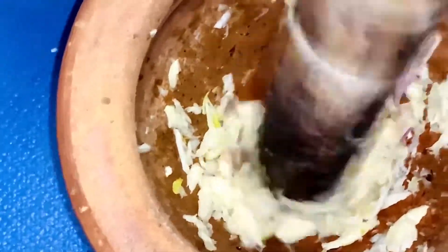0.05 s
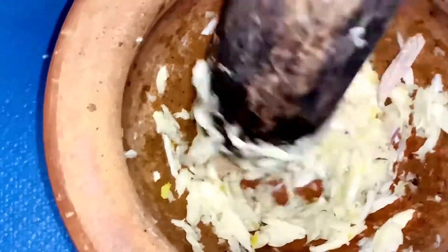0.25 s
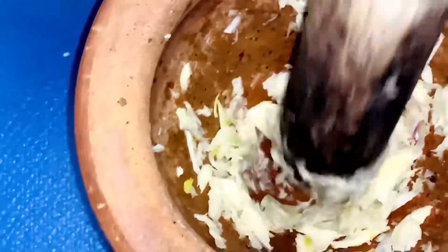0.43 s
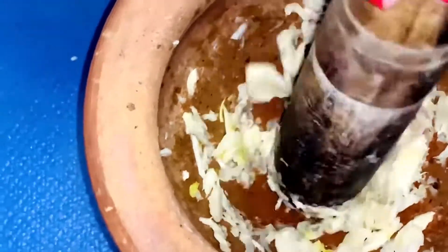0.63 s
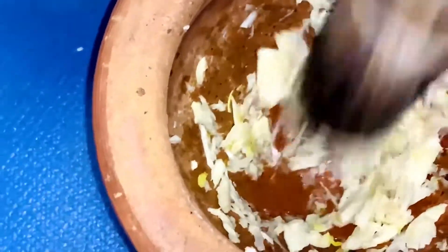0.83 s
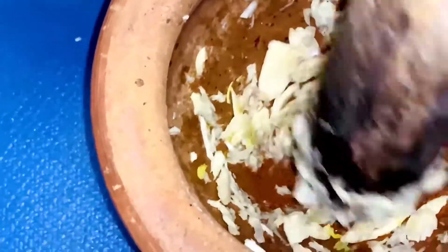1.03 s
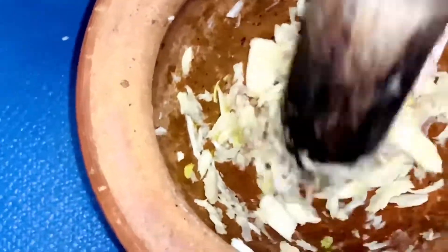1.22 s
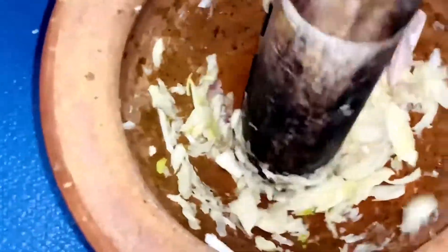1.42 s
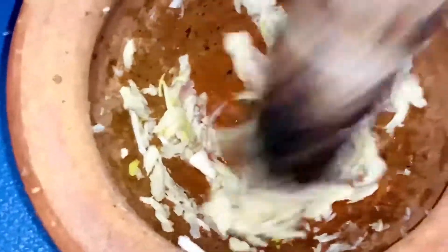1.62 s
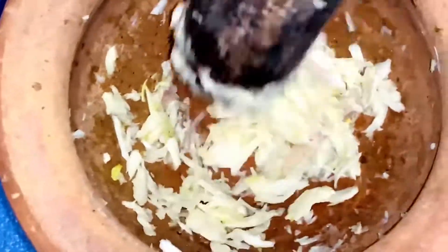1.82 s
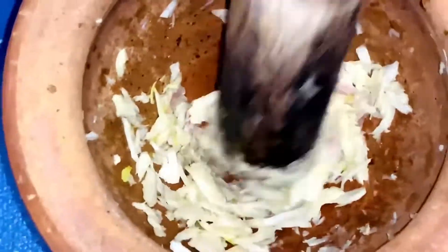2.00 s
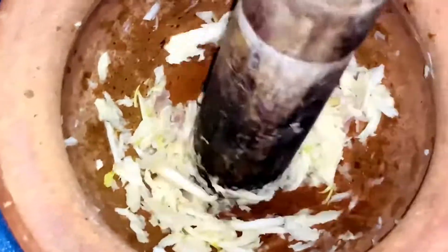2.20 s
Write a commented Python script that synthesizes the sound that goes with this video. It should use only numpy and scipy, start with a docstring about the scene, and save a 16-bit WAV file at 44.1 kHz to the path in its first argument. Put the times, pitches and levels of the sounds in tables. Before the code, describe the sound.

Steady close pounding of a pestle crushing garlic in a clay mortar, thumping and crunching.

```python
"""Pounding garlic in a clay mortar

A wooden pestle works chopped garlic on a kitchen table, about four strokes a second. Each stroke
meets the heap or glances off the wall, crushes the wet pieces, lands on the bottom and lifts with a
squelch. Every contact knocks the clay and thumps the table, heard close, in stereo, in a small room."""
import sys
import numpy as np
from scipy import signal
from scipy.fft import rfft, irfft, next_fast_len
from scipy.io import wavfile
from scipy.ndimage import uniform_filter1d

SR = 44100
rng = np.random.default_rng(int(sys.argv[2]) if len(sys.argv) > 2 else 0)


def to_wav(sig):
    """Store sig (one row per channel, or 1-D mono) as 16-bit WAV at the path in sys.argv[1].

    Samples outside -1..1 are clipped; the rate is SR.
    """
    pcm = np.clip(np.atleast_2d(sig), -1, 1) * 32767
    pcm = np.round(pcm).astype(np.int16)
    wavfile.write(sys.argv[1], SR, pcm.T)  # frames by channels


N = 103635

# pestle meets heap or wall: t/s, table thump/dB, clay knock/dB, knock brightness/Hz, crunch/dB
TOUCHES = [(0.2132, -26, -46, 1960, -34.5), (.479, -19, -26.5, 1560, -44), (0.7299, -25.5, -59, 2010, -44),
           (0.9837, -14.5, -28, 3000, -37), (1.2433, -25, -23.5, 2740, -45),
           (1.5099, -22.5, -44, 2340, -47.5), (1.7591, -15, -11, 4080, -35.5),
           (2.0269, -16.5, -15.5, 3500, -43), (2.27, -26.5, -39, 2480, -47.5)]
# pestle lands on the bottom: t/s, table thump/dB, thump brightness/Hz, clay knock/dB,
# knock brightness/Hz, crunch/dB, crunch build-up/s
LANDINGS = [(-.04, -6, 292, -21, 1580, -38, 0.0094), (0.221, -5.5, 450, -4, 1350, -28.5, 0.0039),
            (.494, -8, 278, -24.5, 1270, -28, 0.0049), (0.7568, -9, 216.6, -28, 1305, -29.5, 0.0065),
            (1.0077, -21, 286.5, -35, 1780, -34.5, 0.0049), (1.269, -12, 210, -31, 1800, -32.5, 0.0084),
            (1.535, -15, 186.8, -34, 1800, -34.5, 0.0094), (1.79, -20.5, 260, -34.5, 1810, -36, 0.015),
            (2.0578, -19.5, 186, -40.5, 1800, -30.5, 0.0095)]
TABLE_PAN_DB, CLAY_PAN_DB = -0.56, 0.57


def amp(db):
    """Decibels to gain."""
    return 10 ** (np.asarray(db) / 20)


def curve_at(points, hz):
    """Reads a curve on a log-frequency axis."""
    f, value = np.transpose(points)
    return np.interp(np.log(hz + 1), np.log(f + 1), value)


def add(mix, s, sound):
    """Mixes a sound in at time s, which may lie before the start."""
    at = round(s * SR)
    sound = sound[..., max(-at, 0):]
    part = mix[..., max(at, 0):][..., :sound.shape[-1]]
    part += sound[..., :part.shape[-1]]


def colour(x, points):
    """Applies an EQ curve scaled to unit mean power."""
    size = next_fast_len(N + 4096, True)
    gain = amp(curve_at(points, np.fft.rfftfreq(size, 1 / SR)))
    return irfft(rfft(x, size) * gain / np.sqrt(np.mean(gain ** 2)), size)[..., :N]


def pan(db):
    """Left and right gains; positive leans left."""
    return amp([[db], [-db]])


def table_thump(edge_hz, left_lag_s=0.00008):
    """The table gives under the mortar and swings back at a sinking pitch."""
    # damped flexing, higher waves arriving first: f/Hz, level/dB, swell/s, shortness, sag/(Hz/s)
    flexes = [(153.5, 1, .012, 13.85, 2803.5), (323, -8.5, 0.0054, 1.9, 3493.5), (46, -28.5, 0.0043, 4, -2)]
    t = np.maximum(np.arange(SR // 20) / SR - np.array([[left_lag_s], [0]]), 0)
    thump = np.zeros_like(t)
    for hz, db, swell, shortness, sag in flexes:
        cushion = 1 / np.sqrt(1 + (hz / edge_hz) ** 4)  # a soft contact barely stirs the higher modes
        envelope = (t / swell * np.exp(1 - t / swell)) ** shortness
        cycles = (hz - sag * (t - swell) / 2) * (t - swell)
        thump += cushion * amp(db) * envelope * np.cos(2 * np.pi * cycles)
    return pan(TABLE_PAN_DB) * thump


def table_ring(rise_s=0.017):
    """The table rings on faintly after each thump."""
    # the table's low modes: f/Hz, level/dB, t60/s
    modes = [(80.1, -26.5, 0.59), (96.15, -18, 0.36), (114, -23.5, 0.26), (173.27, -17, 0.22),
             (215.4, -26, .2), (284, -36.5, 0.25)]
    t = np.arange(SR // 2) / SR
    ring = sum(amp(db - 60 * t / t60) * np.sin(2 * np.pi * hz * t) for hz, db, t60 in modes)
    return pan(TABLE_PAN_DB) * ring * (1 - np.exp(-(t / rise_s) ** 2))


def clay_knock(edge_hz, rise_s=0.00026):
    """The mortar rings briefly, damped by food and pestle; a softer contact sounds fewer modes."""
    # the mortar's modes: f/Hz, level/dB, t60/s, left channel's lead/rad
    modes = [(714, -13.5, 0.0076, 0.59), (974, -2, 0.013, 0.62), (1148, -6, 0.021, 0.69),
             (1557, -14.5, 0.028, 0.9), (1822, -10, 0.013, 0.71), (2470, -9, 0.029, 1.4),
             (2634, -19, 0.11, 0), (2812, -2.5, 0.019, 1), (3390, -14, 0.031, 2.1), (3640, -4.5, .02, 0.06),
             (3772, -4, .018, 1.2), (4130, -10.5, 0.02, 2)]
    t = np.arange(SR // 5) / SR
    ring = np.zeros((2, len(t)))
    for k, (hz, db, t60, lead) in enumerate(modes):
        phase = np.array([[lead], [-lead]]) / 2 + np.pi * (k % 2)  # modes alternate in polarity
        ring += amp(db - 60 * t / t60) * np.sin(2 * np.pi * hz * t + phase)
    ring *= pan(CLAY_PAN_DB) * (1 - np.exp(-t / rise_s))
    return signal.sosfilt(signal.butter(7, edge_hz, fs=SR, output="sos"), ring)


def pestle_hits(touch_thump_hz=330):
    """Both contacts of each stroke shake the table and knock the clay."""
    hits, after_ring = np.zeros((2, N)), table_ring()
    touches = [(s, thump_db, touch_thump_hz, *rest) for s, thump_db, *rest in TOUCHES]
    for s, thump_db, thump_hz, knock_db, knock_hz, *_ in touches + LANDINGS:
        add(hits, s, amp(thump_db) * table_thump(thump_hz))
        add(hits, s, amp(thump_db) * after_ring)
        add(hits, s, amp(knock_db) * clay_knock(knock_hz))
    return hits


def crackle(envelope, per_s, spread_db, patch_hz=600, patch_db=1):
    """Tiny random clicks of uneven size under an envelope; each handful has its own patchy colour."""
    n = len(envelope)
    size = amp(spread_db * np.minimum(rng.exponential(1, n), 4))
    clicks = envelope * size * rng.choice([-1, 1], n) * (rng.random(n) < per_s / SR)
    patches = np.interp(np.fft.rfftfreq(n, 1 / SR) / patch_hz, np.arange(n), rng.standard_normal(n))
    clicks = irfft(rfft(clicks) * amp(patch_db * patches), n)
    return clicks * np.linalg.norm(envelope) / (np.linalg.norm(clicks) + 1e-12)


def crush(t, rise_s, fade_s):
    """Cells burst ever harder up to the contact at t = 0, then die away."""
    return crackle(np.exp(np.minimum(t / rise_s, -t / fade_s)), per_s=3200, spread_db=4)


def wet_pops(envelope):
    """The mash crackles with small wet pops."""
    return crackle(envelope, per_s=2400, spread_db=5)


def garlic(cling_db=-23.5, cling_fade_s=0.018):
    """The pieces crunch under the pestle, a few firm ones snap, and the mash squelches on the lift."""
    # single firm pieces or bubbles bursting: t/s, level/dB, treble tilt/(dB/octave)
    bursts = [(0.2192, -17.5, -0.5), (.478, -32.5, 4.5), (.494, -26, -8.5), (0.574, -45, 5),
              (0.985, -53, -1.5), (1.007, -20.5, 4), (1.047, -47, 12), (1.065, -41.5, 1), (1.510, -33, 5.5),
              (1.5312, -34.5, 0.5), (1.578, -63.5, 4)]
    # pestle pulling out of the wet mash: t/s, level/dB, half length/s
    lifts = [(0.026, -54.5, 0.02), (0.294, -56, 0.019), (0.559, -53.5, 0.011), (0.831, -52.5, 0.011),
             (1.084, -51, 0.011), (1.345, -55.5, 0.0089), (1.6, -57.5, 0.014), (1.876, -52, 0.01),
             (2.123, -55, 0.01)]
    # tone of the crunch, the snaps and the squelch: f/Hz, relative level/dB
    crunch_eq = [(250, -21.5), (600, 7), (1100, 3), (2000, -0.5), (3300, 4.5), (4600, 1.5), (6400, 2.5),
                 (8000, -4), (11000, 3), (14500, 1.5), (16000, 0)]
    snap_eq = [(400, -15), (1200, -11), (3300, 3), (6500, -1.5), (11000, -0.5), (14500, 0), (16000, -5)]
    squelch_eq = [(250, -22.5), (700, -0.5), (1200, 1.5), (2000, -4), (3400, 4), (4800, -2.5), (6400, -2),
                  (9000, -7), (13000, -1.5), (16000, -6)]
    t = np.arange(-SR // 10, SR // 10) / SR
    crunch, snaps, squelch = np.zeros((3, N))
    for s, *_, db in TOUCHES:
        add(crunch, s + t[0], amp(db) * crush(t, rise_s=0.0014, fade_s=0.013))
    cling = np.exp(-t[t >= 0] / cling_fade_s)  # the mash keeps crackling under the resting pestle
    for s, *_, db, build_s in LANDINGS:
        add(crunch, s + t[0], amp(db) * crush(t, rise_s=build_s, fade_s=0.0022))
        add(squelch, s, amp(db + cling_db) * wet_pops(cling))
    octaves = np.log2(np.fft.rfftfreq(len(t), 1 / SR) / 7500 + 1)  # the tilt's knee is at 7500 Hz
    for s, db, tilt in bursts:
        snap = crush(t, rise_s=0.001, fade_s=0.00032)
        slope = amp(tilt * octaves)
        add(snaps, s + t[0], amp(db) * irfft(rfft(snap) * slope / slope.mean()))
    for s, db, half_s in lifts:
        add(squelch, s + t[0], amp(db) * wet_pops(1 / np.cosh(t / half_s * np.sqrt(2))))
    return colour(crunch, crunch_eq) + colour(snaps, snap_eq) + colour(squelch, squelch_eq)


def in_bowl(mono, left_lag_s=0.00012, echo_db=1, t60_s=0.029):
    """The crunch reaches the left side a touch late and echoes quickly inside the bowl."""
    delay = np.exp(-2j * np.pi * np.fft.rfftfreq(N, 1 / SR) * left_lag_s)
    direct = np.array([irfft(rfft(mono) * delay, N), mono])
    t = np.arange(SR // 10) / SR
    tail = rng.standard_normal((2, len(t))) * amp(-60 * t / t60_s)
    tail /= np.linalg.norm(tail[0])
    return direct + amp(echo_db) * signal.fftconvolve(direct, tail, axes=1)[:, :N]


def diffuse_noise():
    """Stereo white noise, narrow in the bass and wide in the treble."""
    # likeness of the two sides: f/Hz, correlation
    likeness = [(60, 0.79), (200, 0.95), (550, 0.64), (1600, 0.083), (15000, .15)]
    left, other = rfft(rng.standard_normal((2, N)))
    same = curve_at(likeness, np.fft.rfftfreq(N, 1 / SR))
    right = same * left + np.sqrt(1 - same ** 2) * other
    return irfft(np.array([left, right]), N)


def kitchen_echo(x):
    """A short diffuse echo, each band dying at its own speed."""
    # the room's decay: f/Hz, t60/s
    decay = [(80, 0.44), (300, 0.27), (1000, 0.17), (3000, 0.3347), (8000, 0.09), (16000, 0.5)]
    # strength of the echo: f/Hz, level/dB
    echo_eq = [(60, -14.5), (150, -16), (400, -17.5), (1000, -16), (3000, -19), (8000, -12), (16000, -30)]
    hz, t, bands = signal.stft(diffuse_noise()[:, :SR], SR, nperseg=512)
    t60 = curve_at(decay, hz)[:, None]
    unit_energy = np.sqrt(2 * np.log(1000) / (t60 * SR))
    gain = amp(curve_at(echo_eq, hz)[:, None] - 60 * t / t60) * unit_energy
    tail = signal.istft(bands * gain * (t > 0), SR, nperseg=512)[1]
    return signal.fftconvolve(x, tail, axes=1)[:, :N]


def room_tone(level_db=-53.5):
    """The kitchen's steady low hush."""
    # tone of the hush: f/Hz, relative level/dB
    hush_eq = [(25, -19), (75, 6), (130, 1), (240, -12.5), (650, -14.5), (1100, -26.5), (1800, -29.5),
               (2600, -28.5), (3400, -45.5), (8000, -44), (9600, -36.5), (11000, -54), (16000, -41.5)]
    return amp(level_db) * colour(diffuse_noise(), hush_eq)


def scene():
    """The close strokes, their echo and the room tone."""
    strokes = pestle_hits() + in_bowl(garlic())
    return strokes + kitchen_echo(strokes) + room_tone()


def record(dry, stop_s=2.277, top_hz=16100):
    """The sound stops short as the last stroke begins; a steep low-pass trims the top."""
    gate = uniform_filter1d((np.arange(N) / SR < stop_s) * 1., size=64)
    lowpass = signal.firwin(511, top_hz, window=("kaiser", 9), fs=SR)
    return signal.oaconvolve(dry * gate, lowpass[None], "same")


dry = scene()
out = record(dry)
to_wav(out)
```